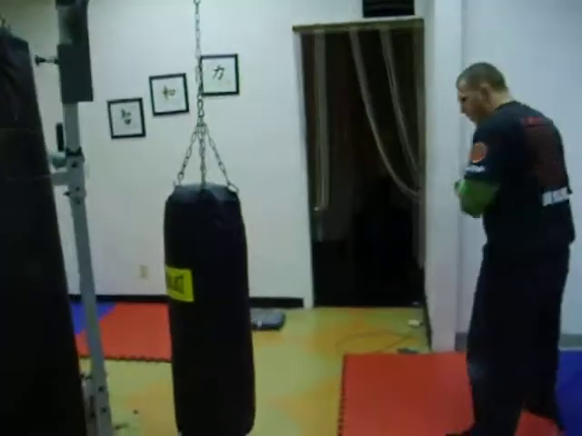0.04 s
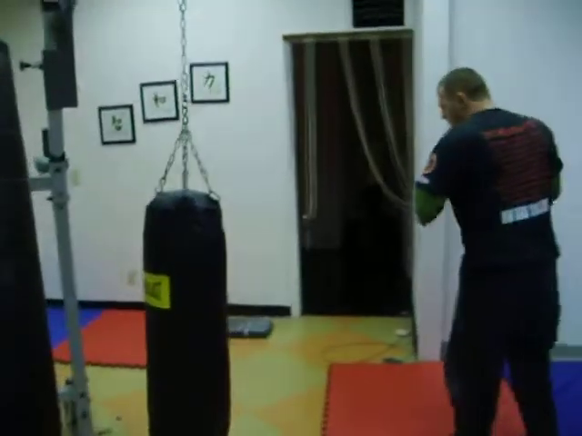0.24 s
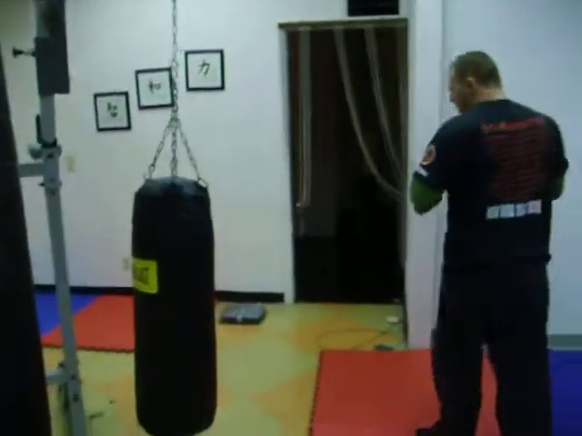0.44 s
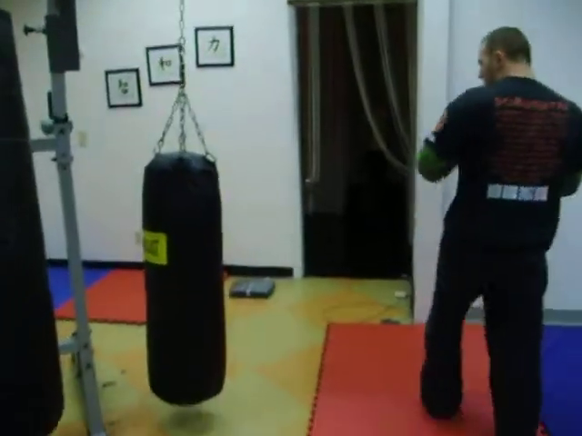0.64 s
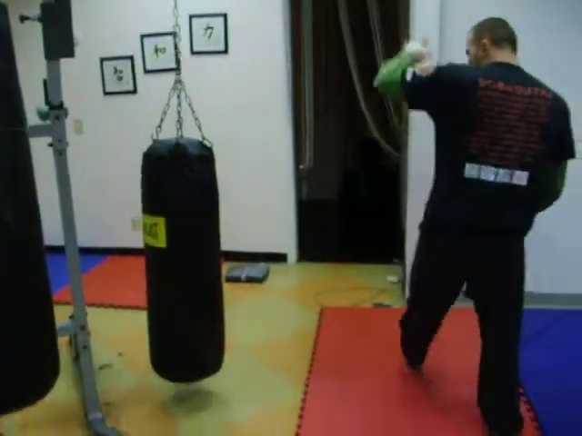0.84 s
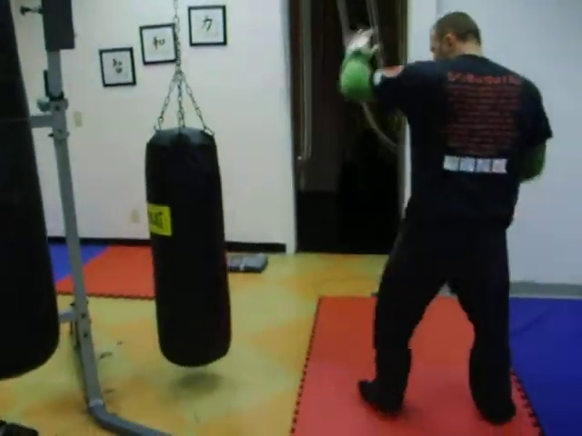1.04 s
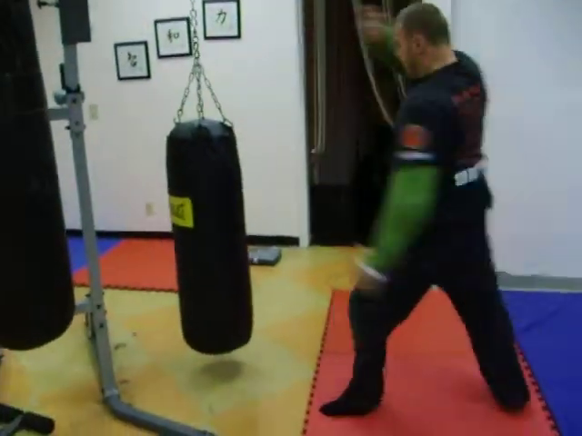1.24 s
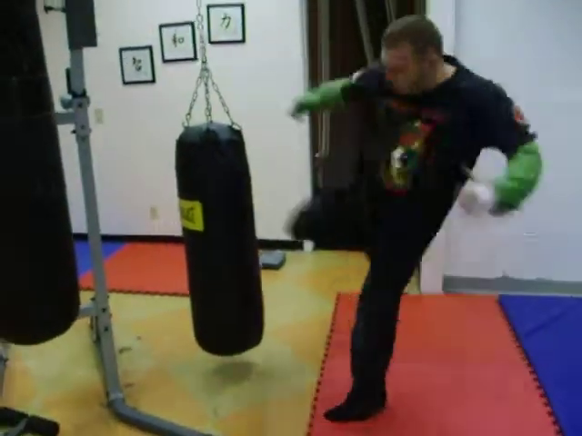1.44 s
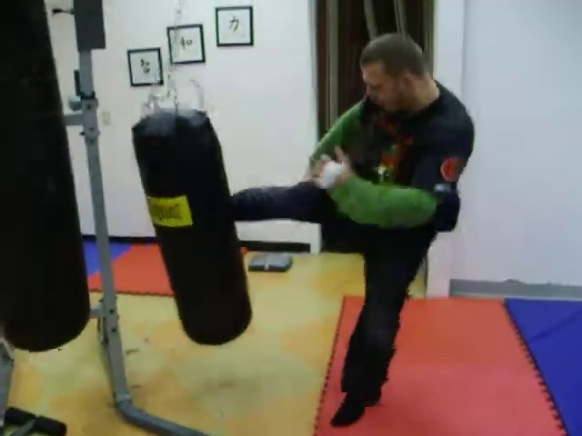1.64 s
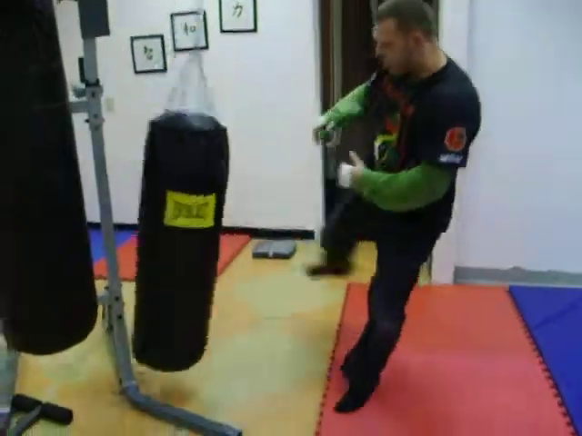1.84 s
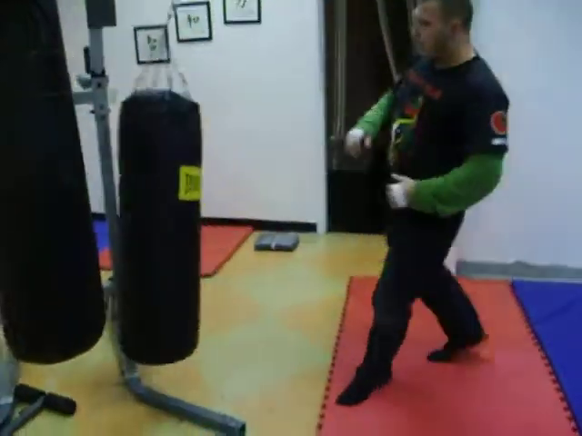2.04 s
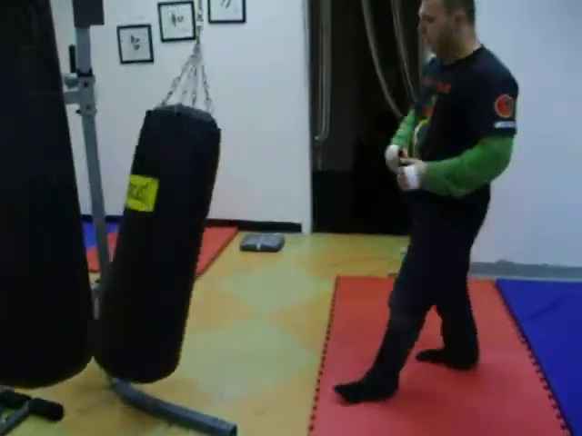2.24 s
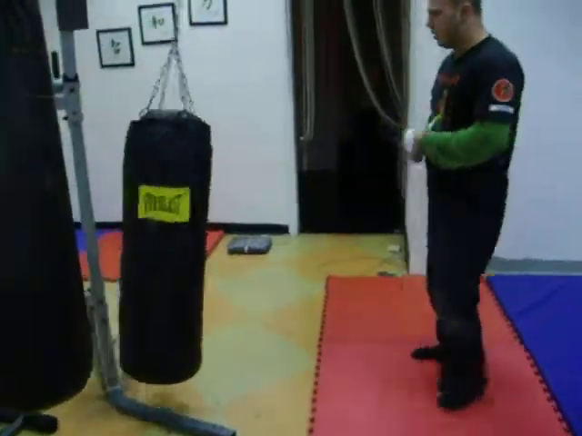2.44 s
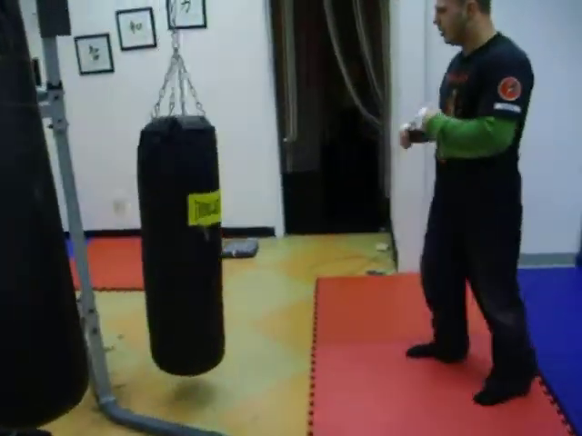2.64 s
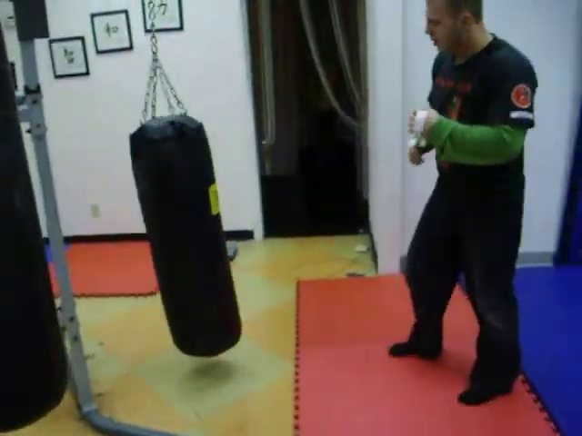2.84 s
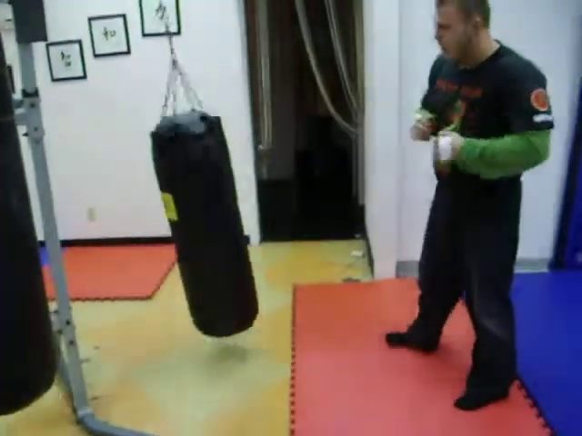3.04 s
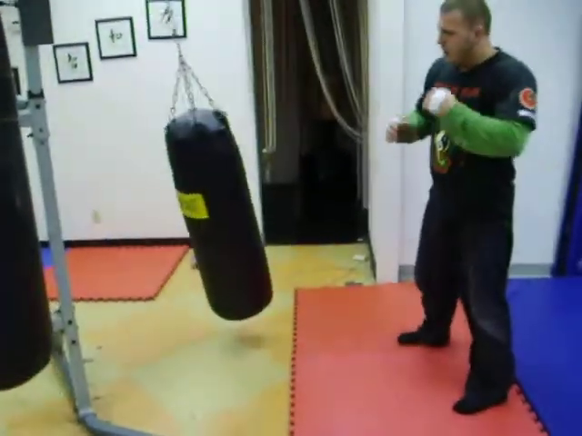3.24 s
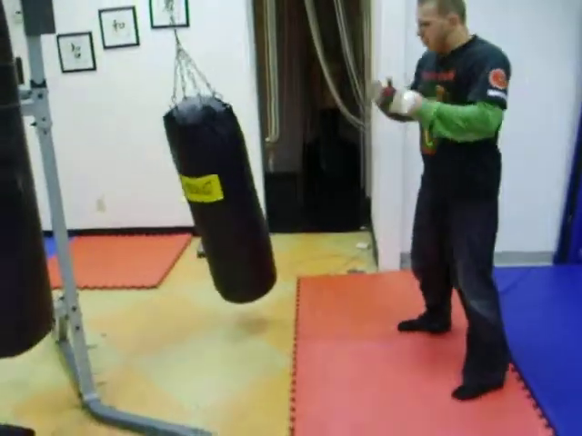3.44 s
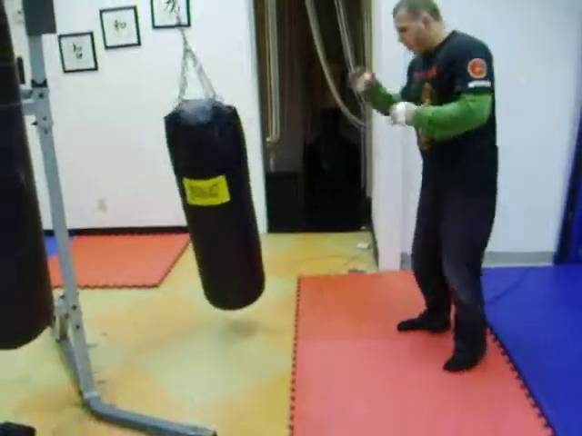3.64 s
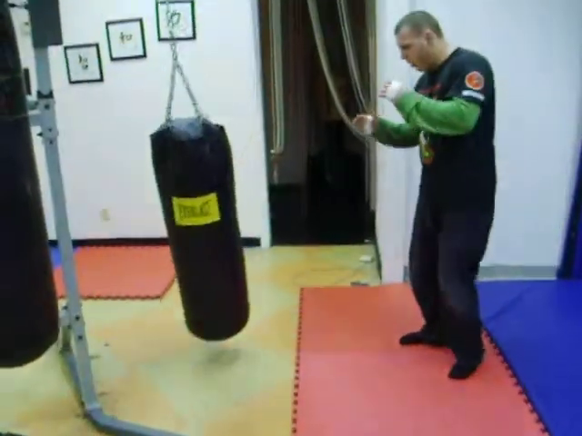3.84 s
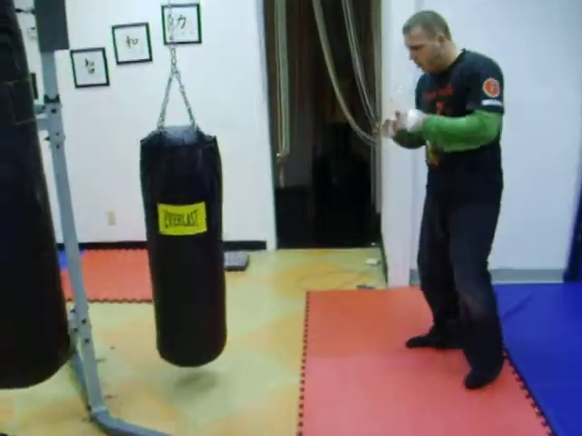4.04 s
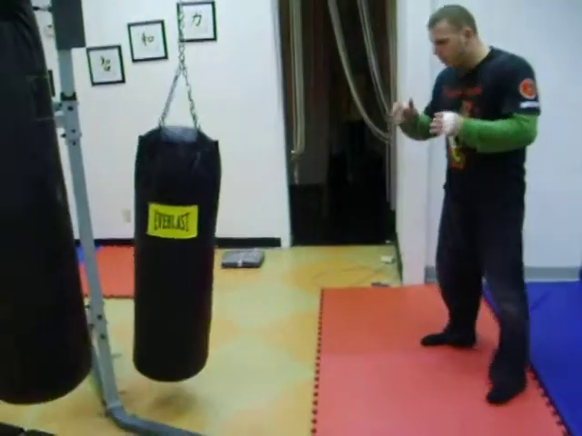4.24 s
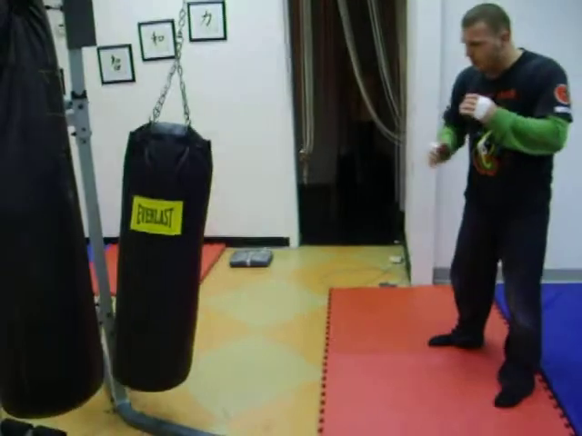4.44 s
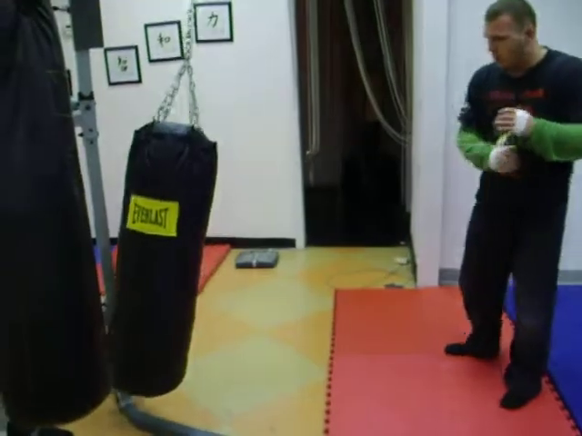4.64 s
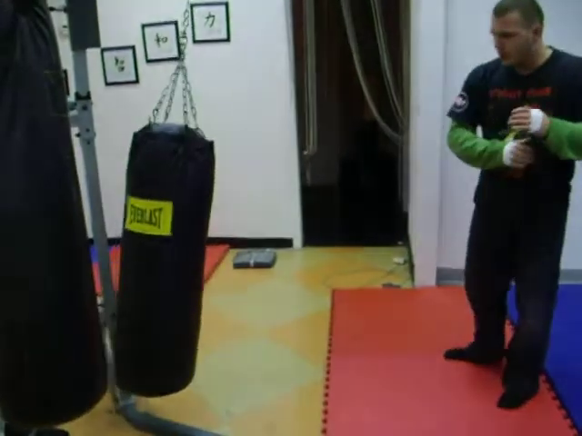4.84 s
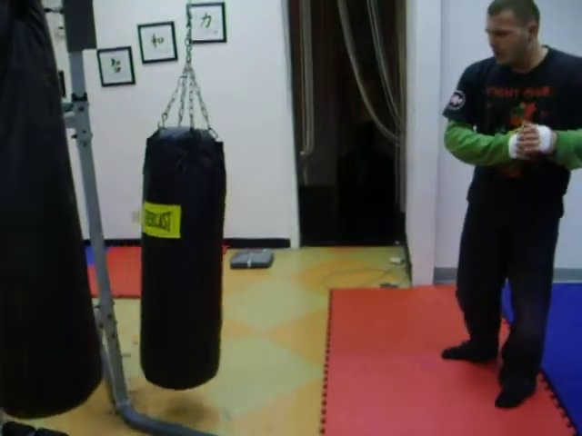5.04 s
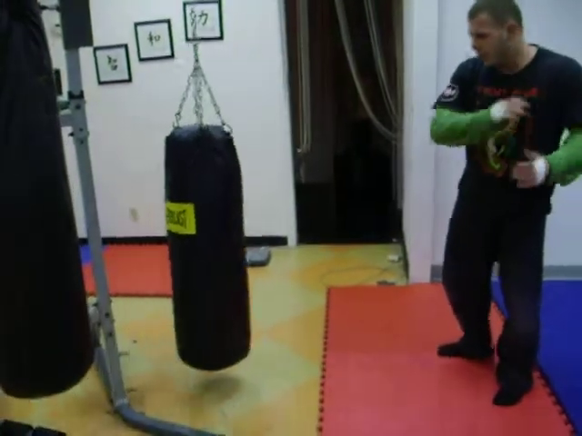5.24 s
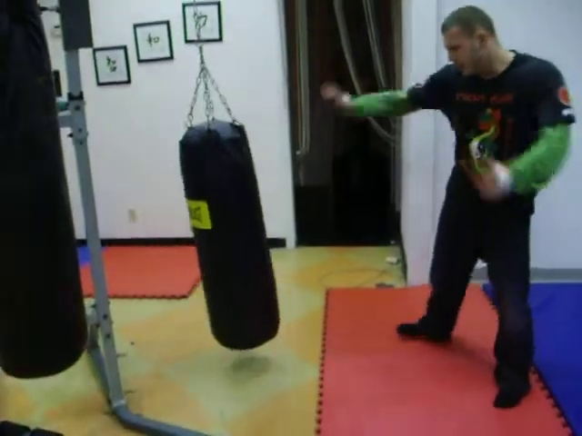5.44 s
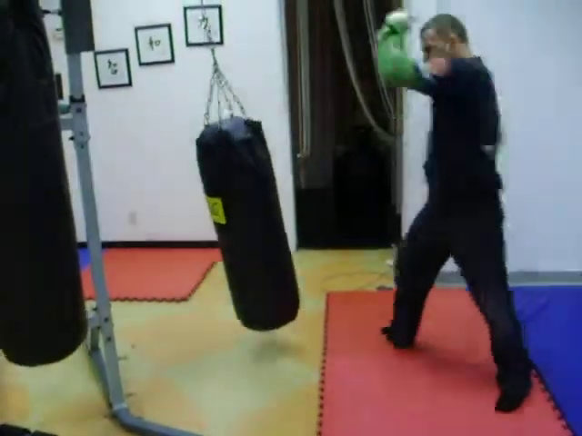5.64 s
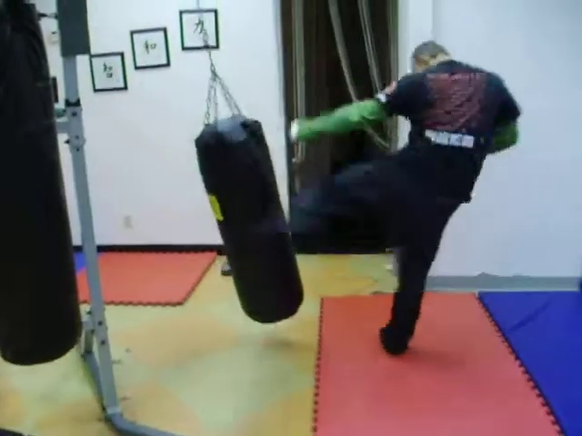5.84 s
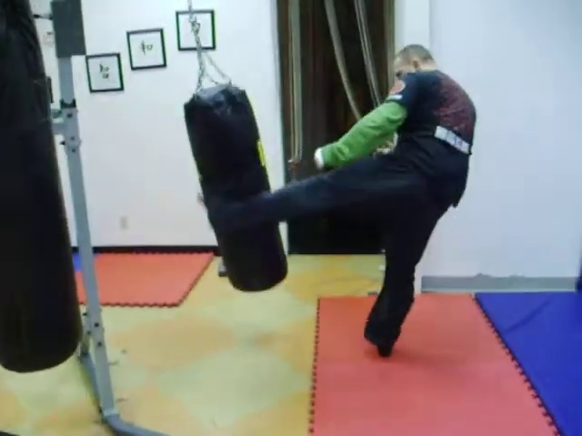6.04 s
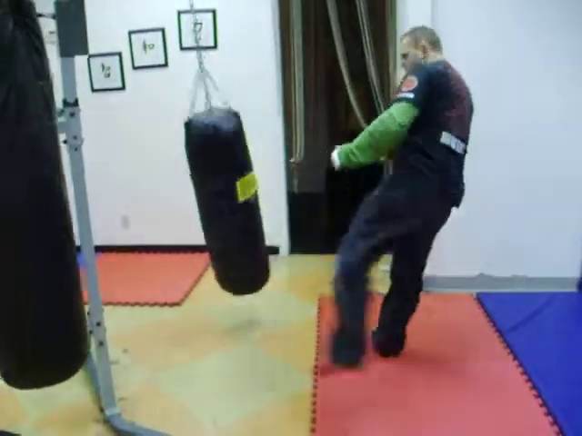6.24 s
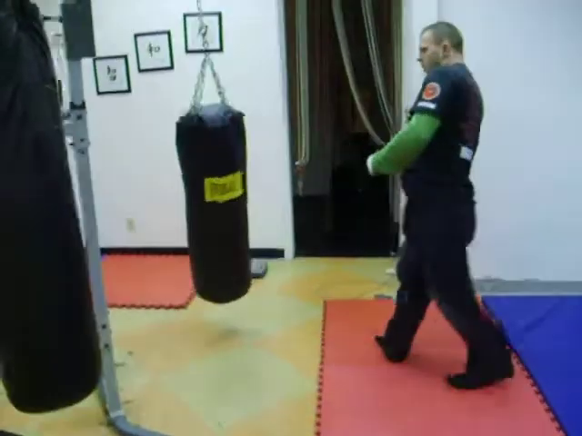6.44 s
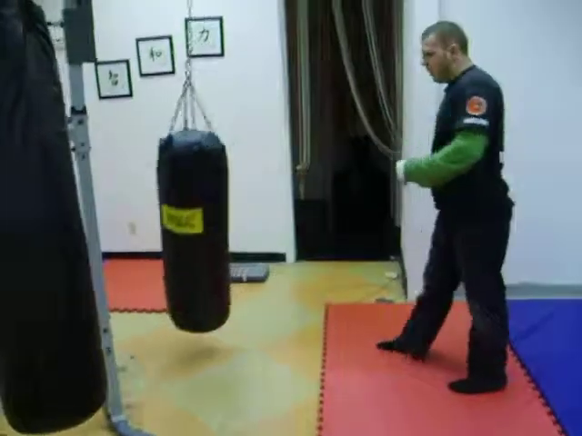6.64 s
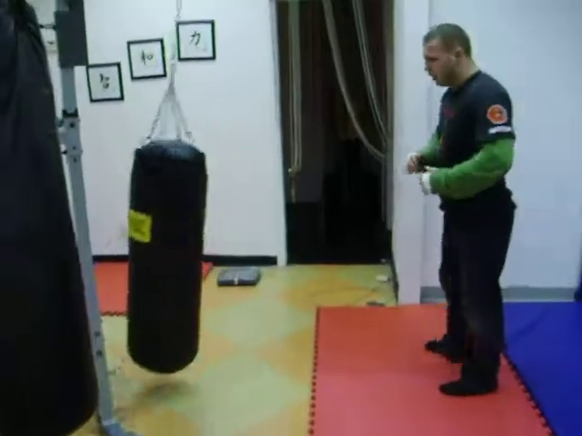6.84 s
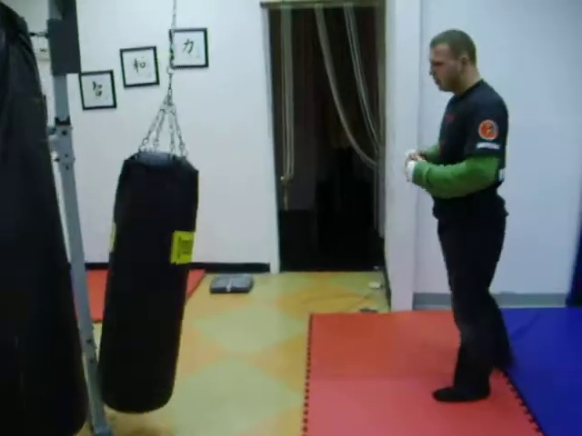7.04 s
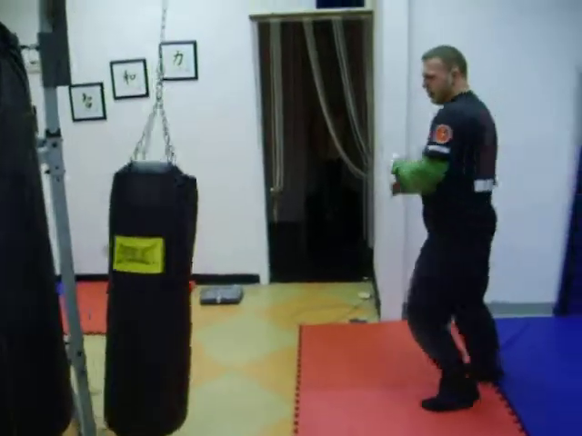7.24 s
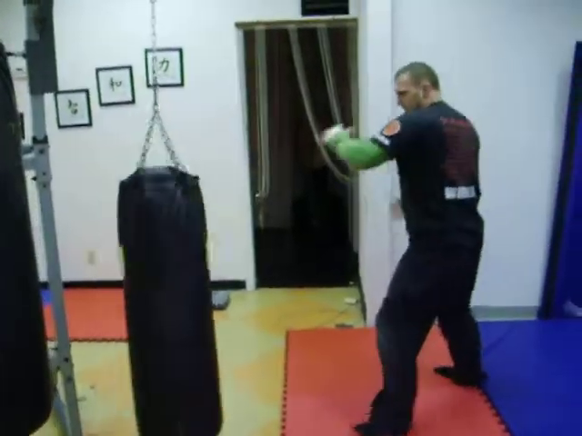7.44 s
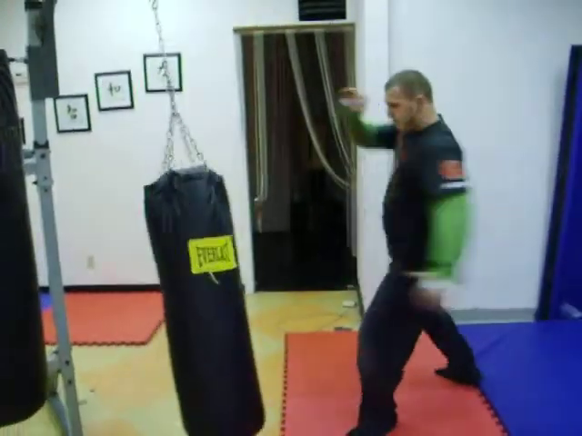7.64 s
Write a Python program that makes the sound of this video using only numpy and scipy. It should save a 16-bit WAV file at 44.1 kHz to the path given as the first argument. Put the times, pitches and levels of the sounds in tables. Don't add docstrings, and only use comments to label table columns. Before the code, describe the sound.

A small, hard-walled gym is heard through a compact camera with steady low hiss, faint electrical whine and rapid soft ticking. Chain links clink at 0 and 0.2 s; soft soles pat and drag on foam from 0.4 to 1.5 s, with cloth rustling. At 1.6 s a heavy kick slaps leather with a deep, short boom. The chain rattles at once, crashing brightest around 2.1 s and again at 2.4 s, while the stand knocks dully; it thins by 3 s. Loose clinks follow from 3.2 to 4.9 s, strongest near 3.4. Feet shuffle again at 5.2-5.9 s. At 5.96 s a harder, tighter kick cracks and distorts; links clatter violently, with a huge metallic snap at 6.4 s and another crash at 6.7, then irregular jingling. A small electrical click falls at 6.94 s. Around 7.5-7.65 s the swivel gives a thin rising squeak amid the last clinks.

```python
import sys
import numpy as np
from scipy import signal
from scipy.fft import rfft, irfft
from scipy.io import wavfile
from scipy.ndimage import uniform_filter1d, map_coordinates

SR = 44100
rng = np.random.default_rng(int(sys.argv[2]) if len(sys.argv) > 2 else 0)


def ratio_of_db(decibels):
    return 10 ** (np.asarray(decibels, float) / 20)


def generate_wav(signal):
    frames = np.transpose(np.atleast_2d(signal))
    scaled = np.clip(frames, -1, 1) * 32767
    pcm = np.round(scaled).astype(np.int16)
    wavfile.write(sys.argv[1], SR, pcm)


N = 339570
SPAN = 3 * 2 ** 13

# frequency in Hz, level in dB per Hz.
STEEL_COLOUR = [(180, -14), (300, -4.5), (462, -3), (582, -8), (853, -4.5), (1950, -5), (2090, -6.5),
                (3270, -5.5), (5560, -9), (8990, -11.5), (15800, -20.5)]


def unit(x):
    return x / np.sqrt(np.mean(x ** 2, axis=-1, keepdims=True) + 1e-20)


def along(points, hz):
    f, v = np.transpose(points)
    return np.interp(np.log(hz + 1), np.log(f + 1), v)


def causal(gain):
    cepstrum = irfft(np.log(gain + 1e-6))
    half = cepstrum.shape[-1] // 2
    cepstrum[..., 1:half] *= 2
    cepstrum[..., half + 1:] = 0
    return np.exp(rfft(cepstrum))


def resonance(hz, centre_hz, width_hz):
    damping = 1j * hz * width_hz
    return damping / (centre_hz ** 2 - hz ** 2 + damping)


def hiss(spectrum):
    white = rfft(rng.standard_normal(N))
    colour = ratio_of_db(along(spectrum, np.fft.rfftfreq(N, 1 / SR)))
    return unit(irfft(white * colour, N))


def gym(count, wet_db, build_s):
    # frequency in Hz, time to fade by 60 dB in seconds.
    room_decay = [(40, 0.9), (120, 0.753), (500, 0.543), (1400, 0.467), (3700, 0.4303), (9700, 0.334),
                  (15000, 0.2975)]
    hz, t, z = signal.stft(rng.standard_normal((count, SPAN)), SR, nperseg=256)
    fade = ratio_of_db(-60 * t / along(room_decay, hz)[:, None])
    tail = signal.istft(z * fade, SR, nperseg=256)[1][:, :SPAN]
    tail *= 1 - np.exp(-np.arange(SPAN) / SR / build_s)
    tail *= ratio_of_db(wet_db) / np.linalg.norm(tail, axis=1, keepdims=True)
    tail[:, 0] += 1
    return rfft(tail)


def placed(times, db, sounds):
    out = np.zeros(N + SPAN)
    loud = np.sqrt(np.abs(uniform_filter1d(sounds ** 2, SR // 100)).max(axis=1))
    for start, gain, sound in zip(times, ratio_of_db(db) / loud, sounds):
        out[round(start * SR):][:SPAN] += gain * sound
    return out[:N]


def burst(length_s, rise_s, spiky):
    t = np.arange(SPAN) / SR
    shape = (len(length_s), SPAN)
    impacts = rng.standard_normal(shape) * rng.exponential(size=shape) ** spiky
    rise = 1 - np.exp(-t / rise_s)
    stop = np.exp(-(t / np.clip(length_s, .002, .2)[:, None]) ** 2)
    return rfft(impacts * rise * stop)


def struck(times, db, hz, width_hz, rattle_s, wet_db):
    mode = resonance(np.fft.rfftfreq(SPAN, 1 / SR), hz[:, None], width_hz)
    force = burst(np.full(len(hz), rattle_s), rise_s=0.00151, spiky=1.01)
    room = gym(count=len(hz), wet_db=wet_db, build_s=0.0048)
    return placed(times, db, irfft(force * mode ** 2 * room))


def kicks():
    # start in seconds, peak in dB, slap brightness in dB, contact in seconds, boom in dB.
    blows = [
        (1.587, -3.5, 0, 0.0535, -7.5),
        (5.963, 1.5, -0.5, 0.02174, -11.5),
    ]
    # frequency in Hz, level in dB per Hz.
    leather = [(30, -10), (75, -12), (125, -16.5), (200, -11), (270, -7.5), (400, -11), (600, -9),
               (800, -8.5), (1500, -13.5), (3300, -15), (6000, -25.5), (15500, -37)]
    # frequency in Hz, level in dB, time to fade by 60 dB in seconds.
    boom_modes = [(62.24, 4.5, 0.216), (90.1, -5.5, 0.254), (42.05, -11, 0.25), (55.34, -14.5, 0.607),
                  (135, -29, .2), (168.2, -4.5, 0.148)]
    # frequency in Hz, width in Hz, level in dB.
    shell_modes = [
        [(315.7, 135, 4), (554.5, 110, -1.5), (770, 109, -7), (1010, 62, -11.5), (1960, 102, -4.5)],
        [(270.3, 60.7, -4.5), (403.6, 81, -4), (730.4, 145, -1), (1311, 160, -8.5), (1659, 153, -8)],
    ]
    shell_db = [-15, -10]
    s, db, slap_db, contact, boom_db = np.transpose(blows)
    hz, t = np.fft.rfftfreq(SPAN, 1 / SR), np.arange(SPAN) / SR

    colour = causal(ratio_of_db(along(leather, hz) + (slap_db[:, None] - 12.0) * hz / (hz + 2000)))
    force = burst(contact, rise_s=0.00129, spiky=0.14)
    slap = irfft(force * colour * gym(count=len(s), wet_db=-5.0, build_s=0.004))

    boom = sum(ratio_of_db(d - 60 * t / t60) * np.cos(2 * np.pi * f * t) for f, d, t60 in boom_modes)
    boom = boom * (1 - np.exp(-t / 0.0274))

    drum = 0
    for start, level_db, modes in zip(s, shell_db, shell_modes):
        f, width, d = np.transpose(modes)
        width = np.clip(width, 40, 400)[:, None]
        drum = drum + struck(np.full(len(f), start), level_db + d, f, width, rattle_s=0.0491, wet_db=-7.0)
    return drum + placed(s, db - 4.0, slap) + placed(s, boom_db, np.array([boom, boom]))


def chain():
    # start in
    # seconds, peak in dB, small links in dB, rattle in seconds, loudest ring in Hz.
    swinging = [(0.0, -21, -23.5, 0.0119, 2500), (0.190, -18.5, -23, 0.051, 2900),
                (3.1653, -28.5, -21, 0.0106, 2960), (3.4045, -15, -20.5, 0.0313, 2720),
                (3.6269, -21, -23, 0.029, 2570), (3.7187, -25, -26.5, 0.0206, 3240),
                (4.180, -22, -19, 0.0564, 2690), (4.333, -19, -19.5, 0.0558, 2920),
                (4.6028, -18.5, -19, 0.0217, 2940), (4.7269, -21.5, -18.5, 0.0186, 2880),
                (4.8646, -18, -20, 0.01366, 2620)]
    after_first = [(1.6488, -13, -18, 0.0203, 2150), (1.6989, -15, -24, 0.0157, 3050),
                   (1.7673, -20, -22, 0.03, 3600), (1.8383, -22.5, -20, 0.049, 3260),
                   (1.923, -17, -20, 0.0325, 2220), (1.9814, -19, -18, 0.0593, 2130),
                   (2.066, -9.5, -14, 0.0299, 3650), (2.1815, -12.5, -19, 0.0219, 3820),
                   (2.2995, -19.5, -19, 0.0157, 2460), (2.3592, -19.5, -21.5, 0.0246, 2470),
                   (2.4085, -13, -14.5, 0.019, 3040), (2.4676, -22, -25.5, 0.038, 1400),
                   (2.5891, -26, -14, 0.0116, 2970), (2.69, -29, -12, 0.0165, 2870),
                   (2.854, -22.5, -10.5, 0.0144, 3500), (2.9679, -29.5, -23.5, 0.0269, 1200),
                   (3.2395, -31.5, -10, 0.0464, 2850)]
    after_second = [(6.029, -11.5, -12, 0.047, 2200), (6.0922, -9, -16.5, 0.0222, 3450),
                    (6.193, -12.5, -22.5, 0.042, 2760), (6.23, -13, -12, 0.014, 2770),
                    (6.2786, -11.5, -24, 0.0173, 2830), (6.3288, -14, -20, 0.0774, 2630),
                    (6.3795, -2, -24.5, 0.0175, 3120), (6.4486, -13.5, -22, 0.0645, 2260),
                    (6.546, -12, -15.5, 0.039, 2660), (6.641, -11, -17.5, 0.056, 2880),
                    (6.6831, -6.5, -12.5, 0.01196, 3380), (6.7902, -14, -22, 0.0906, 2650),
                    (6.846, -10.5, -11, 0.0339, 3400), (6.9278, -25, -12, 0.0213, 2800),
                    (7.0565, -14.5, -16, 0.0634, 2790), (7.0988, -17, -11.5, 0.027, 2830),
                    (7.2087, -16, -17.5, 0.0202, 2820), (7.318, -24.5, -17, 0.0234, 1960),
                    (7.3591, -19, -14.5, 0.0234, 3000), (7.428, -18.5, -15, 0.0215, 3260),
                    (7.501, -27, -22, 0.055, 1930), (7.5534, -22.5, -21.5, 0.0318, 3980)]
    group_tube_db = [-17.5, -8.5, -13]
    # frequency in Hz, width in Hz, level in dB.
    link_modes = [(862, 93, -5), (1152.6, 96, -10.5), (1767, 170, -9), (2690, 320, -2), (3035, 16, -8),
                  (3250, 130, -1.5), (3574, 95, -6), (4208, 67, -6), (4722, 84, -10), (5050, 28, -13),
                  (5380, 31, -12)]
    # frequency in Hz, width in Hz (100 more is added), level in dB (not
    stand_modes = [(2334, 84, -4), (2690, 480, -1), (3338, 116, 0), (4215, 8.5, -7), (4018, 15.3, -7),
                   (4456, 13, -8), (6294, 1150, -11), (7785, 285, -9), (7920, 42, -11), (9630, 5.1, -16),
                   (10160, 234, -15), (10520, 160, -14), (11880, 16, -17), (12400, 68, -15)]
    groups = [swinging, after_first, after_second]
    s, db, links_db, rattle, ring_hz = np.transpose(np.concatenate(groups))[..., None]
    tube_db = np.repeat(group_tube_db, [len(group) for group in groups])[:, None]
    hz = np.fft.rfftfreq(SPAN, 1 / SR)

    high = 1 / (1 + (6000 / (hz + 1)) ** 4)
    low = 1 / (1 + (hz / 1500) ** 4)
    colour = causal(ratio_of_db(along(STEEL_COLOUR, hz) + (links_db + 19.0) * high + (tube_db + 13) * low))

    modes = 1 + 1.12 * resonance(hz, ring_hz, 1715) + 0.55 * resonance(hz, ring_hz, 198)
    links = np.array([ratio_of_db(d) * resonance(hz, f, np.clip(width, 65, 400)) for f, width, d in link_modes])
    modes = modes + ratio_of_db(rng.normal(0, 2.8, (len(s), len(link_modes)))) @ links
    stand = np.array([resonance(hz, f, width + 100) for f, width, _ in stand_modes])
    modes = modes + ratio_of_db(rng.normal(0, 4, (len(s), len(stand_modes))) - 7) @ stand
    for pitch in 700 * 20 ** rng.random((len(s), 24)).T:
        modes = modes + 0.39 * resonance(hz, pitch[:, None], .006 * pitch[:, None] + 30)

    force = burst(rattle[:, 0], rise_s=0.187 * rattle, spiky=0.555)
    crash = irfft(force * colour * modes * gym(count=len(s), wet_db=3, build_s=.006))
    return placed(np.maximum(s[:, 0] - .003, 0), db[:, 0] - 7.5, crash)


def snaps():
    # start in seconds, peak in dB, loudest ring in Hz.
    tight_links = [(1.8005, -16, 12400), (1.8457, -16.5, 11200), (1.925, -16.5, 2050), (1.9477, -12, 2040),
                   (2.0707, -2.5, 3680), (2.0944, -4.5, 3555), (2.1901, -7, 3380), (2.1994, -9, 3390),
                   (2.4092, -12.5, 2890), (3.2921, -30, 2770), (3.4129, -9.5, 3250), (3.426, -9, 3250),
                   (3.6491, -16, 2520), (4.604, -16, 2900), (4.6256, -20.5, 2690), (4.7291, -18.5, 2880),
                   (4.8658, -11.5, 2730), (6.0928, -5.5, 3410), (6.1298, -15, 3390), (6.3768, 6.5, 2990),
                   (6.3963, 1, 2840), (6.4112, -8, 2880), (6.4654, -14.5, 3860), (6.5505, -8, 2730),
                   (6.6544, -9.5, 3250), (7.0771, -11, 2800), (7.2205, -11.5, 2480), (7.4092, -17, 2410),
                   (7.4436, -11.5, 2700), (7.4615, -18, 4320)]
    s, db, ring_hz = np.transpose(tight_links)
    hz = np.fft.rfftfreq(SPAN, 1 / SR)
    band = 1 / (1 + (1600 / (hz + 1)) ** 2) / (1 + (hz / 10000) ** 2)
    ring = 1 + 2.7 * resonance(hz, ring_hz[:, None], 0.145 * ring_hz[:, None])
    colour = causal(ratio_of_db(along(STEEL_COLOUR, hz)) * band) * ring
    force = burst(np.full(len(s), .003), rise_s=0.00052, spiky=1.26)
    crack = irfft(force * colour * gym(count=len(s), wet_db=-2.5, build_s=0.0052))
    return placed(s, db - 14.0, crack)


def pings():
    # start in seconds, peak in dB, frequency in Hz, width in Hz.
    jingles = [(1.65, -30, 11160, 300), (1.655, -32.5, 12200, 300), (1.798, -33.5, 11300, 200),
               (1.80, -35, 11740, 200), (1.803, -37, 13220, 200), (1.803, -44, 9700, 200),
               (1.81, -45, 14880, 200), (1.845, -39, 12200, 250), (1.844, -32, 11100, 250),
               (2.075, -27, 11300, 300), (2.075, -27, 10100, 500), (2.11, -49, 15100, 200),
               (2.18, -33, 11430, 300), (6.039, -27.5, 11280, 300), (6.05, -33, 13000, 300),
               (6.10, -36, 12400, 200), (6.381, -12, 8750, 900), (6.379, -18, 10900, 900),
               (6.385, -21, 840, 300), (6.64, -34, 11900, 302), (6.924, -20, 2877, 108),
               (6.958, -32, 2850, 60), (7.0, -36, 2854, 60), (2.075, -19, 3700, 600),
               (6.095, -20, 3410, 200), (2.42, -31, 720, 500), (6.683, -25, 1100, 400),
               (3.41, -38, 866, 200), (6.862, -25.5, 1850, 120), (0.0, -40, 1190, 500),
               (6.124, -22, 2250, 150), (1.925, -26, 2050, 200)]
    s, db, hz, width = np.transpose(jingles)
    return struck(s, db, hz, np.clip(width, 50, 900)[:, None], rattle_s=.025, wet_db=-5)


def knocks():
    # start in seconds, peak in dB, frequency in Hz.
    tube_notes = [(1.70, -31, 199.1), (1.93, -34, 257.3), (2.055, -29.5, 190), (2.055, -33, 135),
                  (2.18, -34, 192.9), (2.29, -37.5, 191.2), (2.29, -37, 135), (2.40, -31, 194.6),
                  (2.40, -33, 135), (2.545, -35, 194.7), (2.545, -36.5, 134.5), (2.85, -34.5, 193.4),
                  (2.85, -41, 135), (3.3, -43, 142.5), (6.375, -23.5, 279.1), (6.45, -24.5, 193),
                  (6.45, -33.5, 135), (6.43, -25, 348.8), (6.55, -39, 144), (6.62, -36.5, 132.3),
                  (6.76, -35, 195.3), (6.77, -40, 135), (6.83, -41.5, 195.7), (7.3, -42.5, 185.8),
                  (7.54, -44.5, 125), (2.97, -50, 487), (4.34, -46.5, 478), (4.605, -43, 488),
                  (4.866, -42, 483), (7.1, -46, 487)]
    # start in seconds, peak in dB, frequency in Hz.
    floor_thumps = [
        (1.772, -28, 68),
        (1.935, -34, 60),
        (2.19, -35, 55),
        (2.45, -41, 58),
        (6.15, -31, 64),
        (6.56, -41, 62),
        (6.89, -39, 62),
    ]
    s, db, hz = np.transpose(list(tube_notes) + list(floor_thumps))
    return struck(s, db, hz, 25, rattle_s=.003, wet_db=-7)


def squeak():
    # time in seconds, frequency in Hz, level in dB, octave level in dB.
    glide = [
        (7.49, 1854, -46, -63),
        (7.5, 1907, -33.5, -48.5),
        (7.523, 1925, -34.5, -31),
        (7.549, 2011, -27.5, -33.5),
        (7.571, 2068, -25.5, -18.5),
        (7.62, 2113, -30, -27),
        (7.635, 2071, -36.5, -34),
        (7.7, 2077, -44.5, -47),
    ]
    s, hz, db, octave_db = np.transpose(glide)
    since = np.arange(SPAN) / SR
    t = since + s[0]
    flutter_db = 2.6 * map_coordinates(rng.standard_normal(99), [since * 110])
    waver = 1 + .012 * map_coordinates(rng.standard_normal(199), [since * 250])
    phase = 2 * np.pi * np.cumsum(np.interp(t, s, hz) * waver) / SR
    tone = ratio_of_db(np.interp(t, s, db) + flutter_db) * np.sin(.975 * phase)
    octave = ratio_of_db(np.interp(t, s, octave_db) - flutter_db) * np.sin(2 * phase)
    heard = irfft(rfft(tone + octave) * gym(count=1, wet_db=-7, build_s=.006))[0]
    return np.pad(1.17 * heard, (round(s[0] * SR), 0))[:N]


def steps():
    # start in seconds, peak in dB, brightness in dB, contact in seconds.
    footfalls = [(0.44, -28, -51.5, 0.0105), (0.578, -44.5, -26, 0.0194), (0.631, -38, -13, 0.016),
                 (0.719, -43.5, 1, 0.013), (1.218, -30.5, -13, 0.029), (1.371, -32.5, 1, 0.017),
                 (1.422, -29, -11.5, 0.025), (1.538, -30, -1, 0.103), (5.237, -31, -26, 0.023),
                 (5.317, -29.5, -30.5, 0.018), (5.509, -27.5, 8.5, 0.01), (5.748, -27.5, -18, 0.0125),
                 (5.774, -29.5, -21, 0.015), (5.932, -29.5, -13, 0.0039)]
    s, db, bright_db, contact = np.transpose(footfalls)
    hz = np.fft.rfftfreq(SPAN, 1 / SR)
    foam = along([(150, -2.5), (600, 0.5), (1800, 5.5), (5000, -8), (15000, -29)], hz)
    colour = causal(ratio_of_db(foam + (bright_db[:, None] + 17) / (1 + (3500 / (hz + 1)) ** 4)))
    force = burst(contact, rise_s=0.00177, spiky=0.59)
    slap = irfft(force * colour * gym(count=len(s), wet_db=-1.0, build_s=0.0085))
    return placed(s, db - 16, slap)


def scuffs():
    # time of fastest motion in seconds, sole in dB, cloth in dB, time to fade by 20 dB in
    # seconds (its sign is ignored).
    drags = [(0.41, -67, -67.5, -1), (0.549, -48.5, -63, -0.07), (0.64, -62.5, -80.5, 0.08),
             (0.715, -51, -55.5, -0.79), (1.244, -63.5, -51.5, 0.05), (1.40, -48.5, -43, 0.11),
             (1.571, -42, -30.5, 0), (3.9, -51.5, -81, 0.17), (4.03, -57.5, -75, -1.34),
             (5.1, -63, -80, 0.5), (5.27, -60, -62, -0.15), (5.38, -48.5, -57.5, -0.02),
             (5.48, -45, -76, -0.02), (5.52, -49.5, -43, 0.09), (5.776, -53, -45.5, 0.17),
             (5.94, -44, -71.5, -0.19)]
    sole_colour = [(250, -43), (600, 9.0), (1500, 2.5), (3000, -12.5), (5000, -25.5)]
    cloth_colour = [(2500, 3.0), (4000, -2), (8000, -8), (12000, -15.5), (16000, -30)]
    t, out = np.arange(N) / SR, 0
    s, sole_db, cloth_db, fade_s = np.transpose(drags)[..., None]
    away = np.maximum(t - s, (s - t) / 0.935)
    swell = ratio_of_db(-20 * away / np.abs(fade_s))
    for db, colour in ((sole_db, sole_colour), (cloth_db, cloth_colour)):
        grain = ratio_of_db(3.55 * map_coordinates(rng.standard_normal(999), [t * 110]))
        out = out + (ratio_of_db(db) * swell).sum(axis=0) * unit(grain * hiss(colour))
    return out


def camera():
    # time in seconds, level in dB, second edge from 0 to 1.
    spikes = [(1.7045, 4, 0), (2.5044, -23, 0), (2.7696, -40, 0), (2.8098, -29, 0.4), (3.1033, -44, 0.2),
              (3.5699, -30, 0.2), (3.3378, -37, 0.1), (4.1031, -45, 0), (4.1384, -37, 0.8),
              (5.1712, -28, 1), (6.936, 5, 0)]
    # frequency in Hz, level in dB.
    whine_tones = [(947.5, -59), (1190, -72.5), (2169, -66.5), (3300, -70.5), (6751, -64.5), (13501, -70.5),
                   (15369, -81)]
    # frequency in Hz, level in dB per Hz.
    hiss_colour = [(20, -16), (45, 4), (90, -5), (160, -6), (500, -12), (950, -12), (2200, -20),
                   (4900, -28), (8200, -33.5), (15800, -43)]
    frame_s, first_s = .039982, .0317
    t, hz = np.arange(N) / SR, np.fft.rfftfreq(N, 1 / SR)

    first = np.arange(first_s, N / SR - frame_s, frame_s)
    chance = rng.random((len(first), 4))
    first = first + 0.00145 * (chance[:, 0] - .5)
    second = first + .002 + .0055 * chance[:, 1]
    draw = np.zeros(N)
    draw[(first * SR).astype(int)] = -ratio_of_db(5 * chance[:, 2])
    draw[(second * SR).astype(int)] = -ratio_of_db(5 * chance[:, 3] - 1)
    sag = resonance(hz, centre_hz=125.5, width_hz=179) / (1 + 1j * hz / 500) ** 2
    ticks = ratio_of_db(-47.0) * unit(irfft(rfft(draw) * sag, N))

    spit = np.zeros(N)
    for s, db, edge in spikes:
        spit[round(s * SR) + np.array([0, 2])] = -ratio_of_db(db + 7) * np.array([1, edge])
    whine = sum(ratio_of_db(db) * np.sin(2 * np.pi * f * t) for f, db in whine_tones)
    return ticks + spit + whine + ratio_of_db(-48.5) * hiss(hiss_colour)


def scene():
    bag_and_chain = kicks() + chain() + snaps() + pings()
    stand = knocks() + squeak()
    feet = steps() + scuffs()
    return (bag_and_chain + stand + feet + camera())[None]


def band_limit(x):
    return signal.sosfilt(signal.butter(12, 16620, fs=SR, output="sos"), x)


def record(dry):
    top_hz, ceiling = 16000, .72
    clipped = dry / (1 + np.abs(dry / ceiling) ** 14) ** (1 / 14)
    lowpass = np.clip((top_hz - np.fft.rfftfreq(N, 1 / SR)) / 400, .003, 1)
    dulled = irfft(rfft(clipped) * lowpass, N)
    return band_limit(dulled)


dry = scene()
out = record(dry)
generate_wav(out)
```